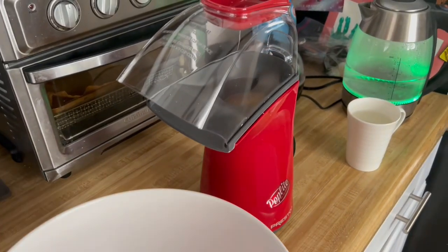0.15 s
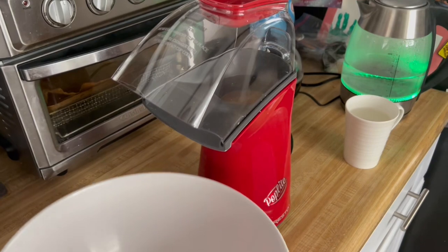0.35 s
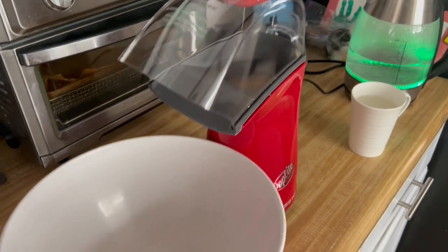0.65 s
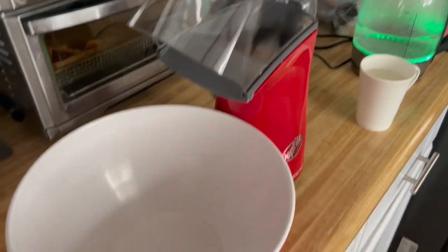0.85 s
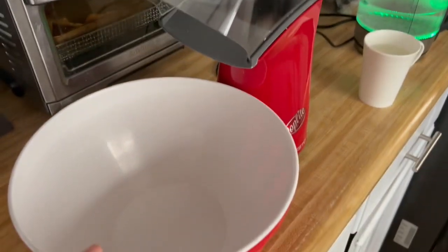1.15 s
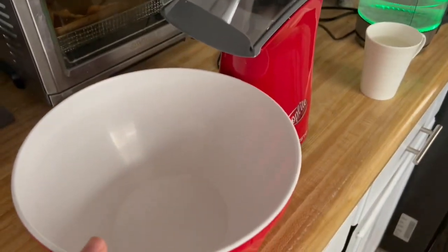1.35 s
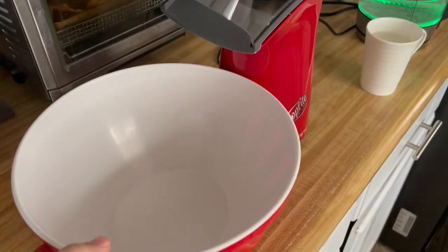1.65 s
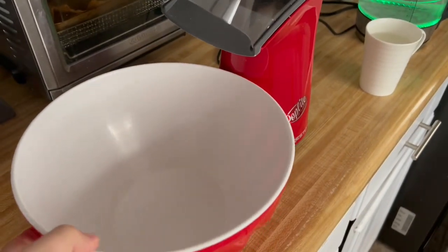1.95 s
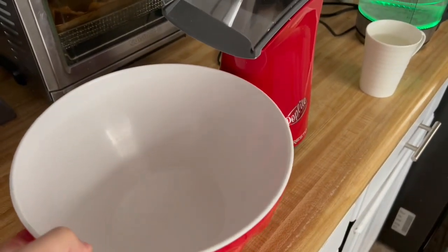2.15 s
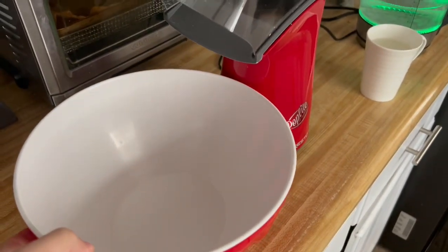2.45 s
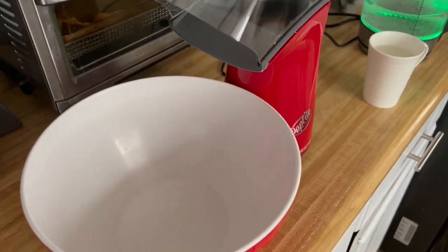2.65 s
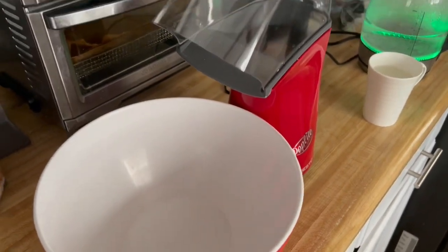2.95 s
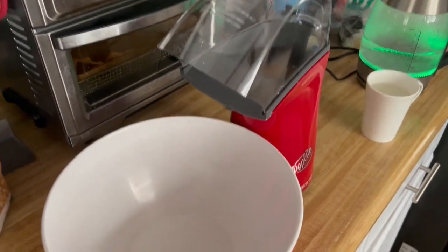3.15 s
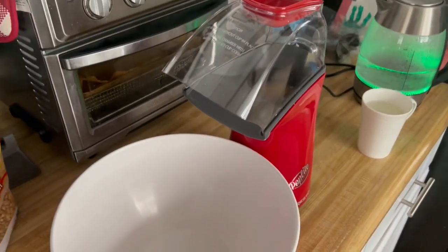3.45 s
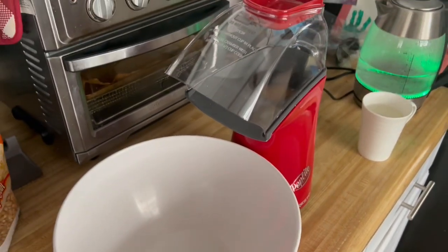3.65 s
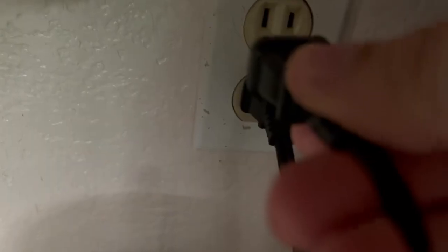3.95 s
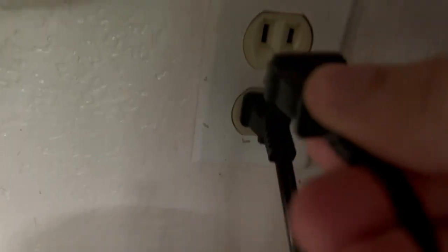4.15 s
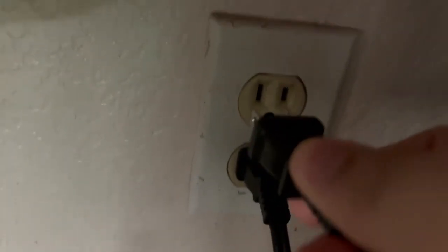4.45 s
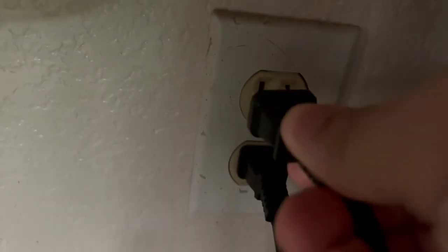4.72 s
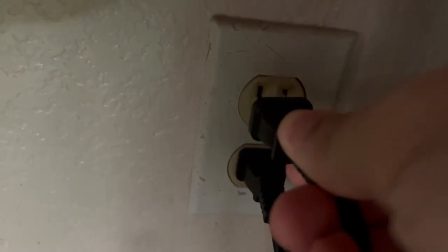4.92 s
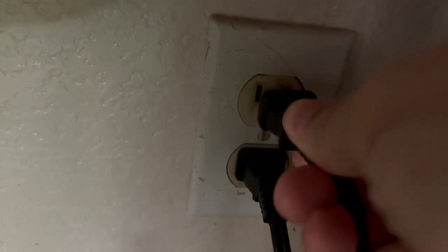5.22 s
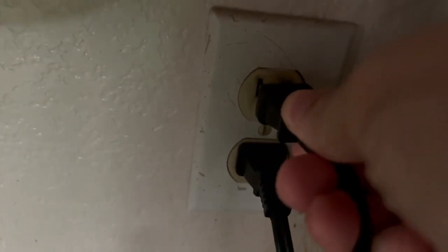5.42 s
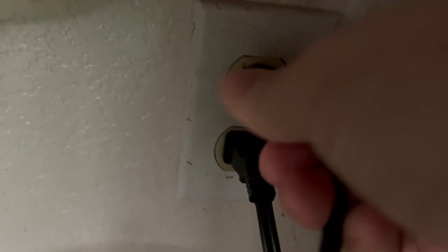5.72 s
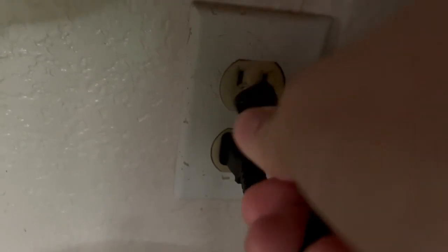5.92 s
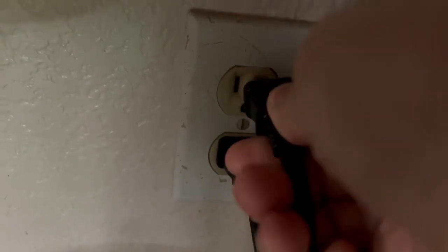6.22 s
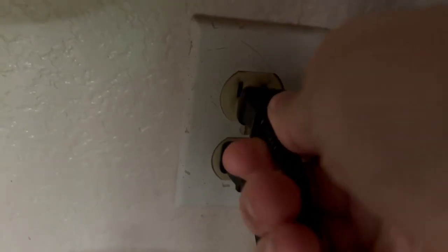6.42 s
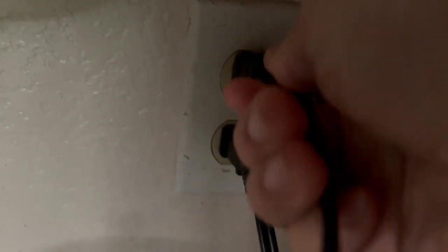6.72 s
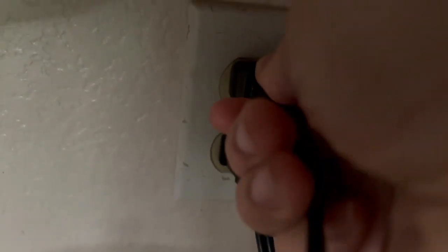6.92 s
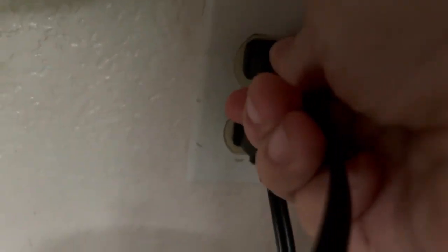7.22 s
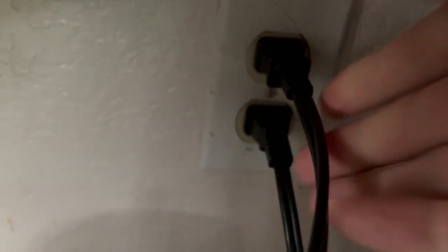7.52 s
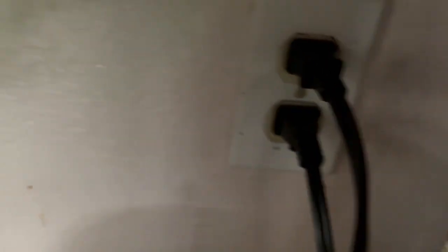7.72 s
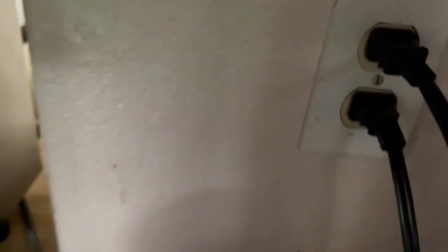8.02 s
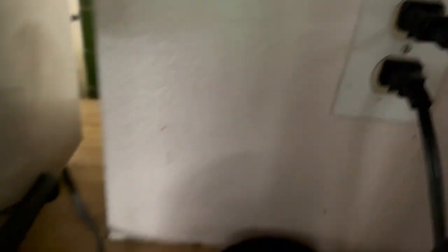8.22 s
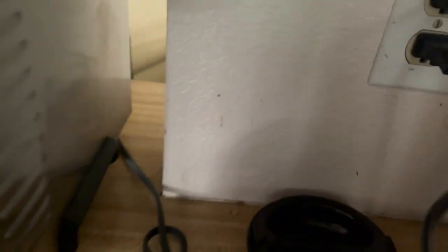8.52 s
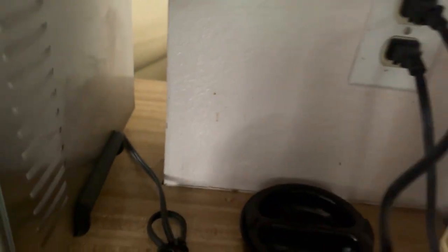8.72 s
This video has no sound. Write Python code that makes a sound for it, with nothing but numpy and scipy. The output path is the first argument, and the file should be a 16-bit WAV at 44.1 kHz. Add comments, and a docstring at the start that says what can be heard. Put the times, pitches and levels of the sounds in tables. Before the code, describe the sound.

Hollow bowl knocks and plug clicks over a kitchen hum, then a popcorn popper's motor speeds up, blowing air and rattling kernels.

```python
"""A kitchen counter, close to a phone; appliances hum throughout. A plastic bowl is knocked and slid
into place. A fingertip taps the phone, which is then held by the wall, where the hum is louder, and a
plug clicks and scrapes its way into a socket. A popcorn popper's motor runs up to speed, its fan
humming through the housing under rushing air. The phone turns towards it as the kernels start to
swirl, tick on the chamber wall and get tossed up the chute."""
import sys
import numpy as np
from scipy import signal
from scipy.fft import rfft, irfft, next_fast_len
from scipy.io import wavfile
from scipy.ndimage import uniform_filter1d, map_coordinates

SR = 44100
rng = np.random.default_rng(int(sys.argv[2]) if len(sys.argv) > 2 else 0)


def dump_mix(stems):
    """Bounce the given channels to the path in sys.argv[1] as a 16-bit WAV at rate SR."""
    frames = np.atleast_2d(stems).T  # one column per channel
    limited = np.clip(frames, -1, 1)  # hard clip at full scale
    pcm = np.round(limited * 32767).astype(np.int16)
    wavfile.write(sys.argv[1], SR, pcm)


N = 391166
TIME = np.arange(N) / SR
WALL_S, TURN_S, TURN_LENGTH_S = 3.86, 7.64, 0.93  # phone at the socket, then turning to the popper


def amp(db):
    """Level to gain."""
    return 10 ** (np.asarray(db) / 20)


def unit(x):
    """Scale to rms 1."""
    return x / np.sqrt(np.mean(x ** 2) + 1e-20)


def along(points, hz):
    """Interpolate (freq_hz, value) points on a log axis."""
    freqs, values = np.transpose(points)
    return np.interp(np.log(hz + 1), np.log(freqs + 1), values)


def ramp(start_s, length_s):
    """Linear rise from 0 to 1."""
    return np.clip((TIME - start_s) / length_s, 0, 1)


def swells(rows):
    """Gaussian envelopes from (centre_s, half_length_s, level_db) rows."""
    return sum(amp(db) * np.exp(-((TIME - s) / half_s) ** 2) for s, half_s, db in rows)


def wobble(rate_hz):
    """Smooth random curve."""
    return map_coordinates(rng.standard_normal(int(N * rate_hz / SR) + 4), [TIME * rate_hz])


def filtered(x, response):
    """Apply a complex frequency response."""
    n = x.shape[-1]
    padded = next_fast_len(n + 8192)
    return irfft(rfft(x, padded) * response(np.fft.rfftfreq(padded, 1 / SR)), padded)[..., :n]


def spectrum(points):
    """Response through (freq_hz, level_db) points."""
    return lambda hz: amp(along(points, hz))


def modes(table):
    """Response of (centre_hz, width_hz, level_db) resonances."""
    return lambda hz: sum(
        (-1) ** k * amp(db) * 1j * hz * width / (centre ** 2 - hz ** 2 + 1j * hz * width)
        for k, (centre, width, db) in enumerate(table))


def placed(x, phase, balance):
    """Two microphone ports hear a source at different phase and level."""
    sides = np.array([[.5], [-.5]])
    return filtered(x, lambda hz: np.exp(1j * sides * along(phase, hz)) * amp(sides * along(balance, hz)))


def rush(response, coherence, patchy_db):
    """Stereo noise, rms 1, with random gain patches in time and frequency."""
    bins = signal.stft(rng.standard_normal((2, N)), nperseg=512)[2]
    patches = uniform_filter1d(uniform_filter1d(rng.standard_normal(bins.shape[1:]), 6, 0), 10, 1)
    pair = signal.istft(bins * amp(patchy_db * unit(patches)), nperseg=512)[1][:, :N]
    angle = lambda hz: np.arccos(np.clip(along(coherence, hz), -1, 1)) / 2
    mid, side = filtered(pair, lambda hz: response(hz) * [np.cos(angle(hz)), np.sin(angle(hz))])
    return unit(np.array([mid + side, mid - side]))


# room noise spectra: freq_hz, level_db
RUMBLE = [(15, -56.5), (25, -25.5), (40, -3.5), (64, -21), (88, -10), (127, -3), (188, -10), (208, -15),
          (301, -15), (425, -27), (469, -24.5), (1060, -35), (1320, -38.5), (1730, -40.5), (9000, -73),
          (11700, -92), (19800, -120)]
HISS = [(530, -52), (900, -10.5), (1270, -5.5), (1590, -5.5), (2050, -7.5), (3300, -24.5), (3940, -14),
        (5120, -12), (7060, -11), (15500, -43.5)]
# rumble, left to right: freq_hz, coherence
RUMBLE_COHERENCE = [(60, 0.93), (150, 0.94), (300, 0.9), (1000, 0.057)]
# room layers: counter_db, socket_db, turn_change_db
HUM_DB, RUMBLE_DB, HISS_DB = (-57, -45, -9), (-53.5, -47, 2), (-80, -77, -4)


def room():
    """Wavering mains hum and its third harmonic, a small fan, building rumble, faint hiss."""
    at_wall, turned = ramp(WALL_S, 0.0074), ramp(TURN_S, TURN_LENGTH_S)
    hum_db, rumble_db, hiss_db = [
        counter + (socket - counter) * at_wall + change * turned + 1.6 * wobble(1.9)
        for counter, socket, change in (HUM_DB, RUMBLE_DB, HISS_DB)]
    hum = amp(hum_db + 0.81 * wobble(8.7)) * np.sin(2 * np.pi * 59.7 * TIME + 0.6 * wobble(9))
    third = amp(hum_db - 10 + 1.4 * wobble(6)) * np.sin(2 * np.pi * 179 * TIME + 0.99 * wobble(7.2))
    fan = amp(-82) * unit(filtered(rng.standard_normal(N), modes([(1870, 250, 0)])))
    rumble = amp(rumble_db) * rush(spectrum(RUMBLE), RUMBLE_COHERENCE, patchy_db=0.1)
    hiss = amp(hiss_db) * rush(spectrum(HISS), coherence=[(1000, 0.13)], patchy_db=6)
    return np.sqrt(2) * hum + third + fan + rumble + hiss


def struck(contacts, body, snap_spectrum, rattle_s, t60_s):
    """Each contact rings low, middle and high modes (thud, knock, clack) and adds a noisy snap."""
    out, t = np.zeros(N + SR), np.arange(SR // 3) / SR
    linger_db = 22.5  # thud excess over clack or snap that doubles the fade time
    for start_s, clack_db, clack_hz, thud_db, knock_db, snap_db in contacts:
        scatter_db, phases = rng.standard_normal((2, len(body))) * [[2.5], [0.9]]
        excess_db = np.clip(thud_db - max(clack_db, snap_db), -2 * linger_db, linger_db)
        fade = amp(-60 * t / (t60_s * 2 ** (excess_db / linger_db)))
        ring = 0
        for k, (hz, mode_db, mode_t60_s) in enumerate(body):
            spot_db = clack_db - 4 - 13 * abs(np.log2(hz / clack_hz))  # the spot favours its own pitch
            blow_db = thud_db if hz < 260 else knock_db if hz < 750 else spot_db if hz < 3500 else snap_db
            decay = amp(mode_db + scatter_db[k] + blow_db - 60 * t / mode_t60_s)
            attack = 1 - np.exp(-t * hz / 0.71)
            ring += (-1) ** k * decay * attack * np.sin(2 * np.pi * hz * t + phases[k])
        rattle = amp(-60 * t / rattle_s) + 0.46 * fade  # sharp edge over a longer scrape
        noise = rng.standard_normal((2, len(t)))
        chatter_db = 4.5 * np.minimum(t / 0.0085, 1) * np.repeat(rng.standard_normal(len(t) // 100), 100)
        noise *= amp(chatter_db)
        snap = amp(snap_db) * unit(filtered(noise[0], spectrum(snap_spectrum)))
        clack = unit(filtered(noise[1], modes([(clack_hz, 300, 1.5), (1500, 2500, -12)])))
        hit = ring * np.sqrt(fade) + rattle * amp(clack_db - 9.5) * clack
        hit *= 1 - np.exp(-t / 0.0014)  # plastic gives before it rings
        hit += rattle * snap * (1 - np.exp(-t / 0.00078))
        out[round(start_s * SR):][:len(t)] += hit
    return out[:N]


# bowl on counter: start_s, clack_db, clack_hz, thud_db, knock_db, snap_db
BOWL_CONTACTS = [(0.288, -6, 1121, -11, -12.5, -37.5), (0.463, -10, 1017, -15, -14, -34.5),
                 (0.577, -14, 1236, -28.5, -30, -23), (0.606, -18, 954, -18.5, -29, -53),
                 (0.621, -31, 1060, -19.5, -34.5, -42.5), (0.94, -55, 935, -55, -72.5, -63),
                 (1.904, -29, 1170, -42.5, -38.5, -39), (1.995, -42, 1230, -20.5, -38.5, -58),
                 (2.14, -48, 802, -43, -72, -64), (2.246, -58, 840, -63, -68, -57.5),
                 (2.317, -53.5, 2270, -30.5, -52, -72), (2.554, -54.5, 2290, -74, -67, -66),
                 (2.739, -73, 2720, -66, -65, -47), ]
# bowl modes: pitch_hz, level_db, t60_s
BOWL_MODES = [(68.6, -6, 0.2), (129, -1.5, 0.04), (177, -2.5, 0.15), (252, 3, 0.063), (328, 0.5, 0.07),
              (430, 3, 0.06), (499.5, 1.5, 0.058), (586, -1, 0.06), (770, -4.5, 0.082), (1037, -9.5, 0.06),
              (1445, -7, 0.042), (2320, -7.5, 0.1), (2600, -8, 0.05)]
# contact noise: freq_hz, level_db
BOWL_NOISE = [(800, -24), (2000, -2.5), (3500, 0), (5000, -1.5), (7000, -1), (10000, -13), (15500, -16),
              (16200, -56.5)]


def bowl_knocks():
    """A plastic bowl rings as it hits the counter."""
    return struck(BOWL_CONTACTS, BOWL_MODES, BOWL_NOISE, rattle_s=0.02, t60_s=0.16)


# rubs: centre_s, half_length_s, level_db
SLIDES = [(1.414, 0.025, -79), (1.742, 0.031, -69), (2.535, 0.058, -77), (1.2, 0.029, -76.5),
          (4.0, 0.067, -93), (5.0, 0.24, -74)]
# squeaks: start_s, length_s, pitch_hz, rise_hz, level_db
SQUEAKS = [(1.373, 0.13, 5960, 700, -71), (3.726, .12, 6100, 199, -80.5)]


def rubbing():
    """Friction on the counter: soft slides, thin squeaks arching in pitch."""
    out = swells(SLIDES) * unit(filtered(rng.standard_normal(N), spectrum(BOWL_NOISE)))
    for start_s, length_s, pitch_hz, rise_hz, db in SQUEAKS:
        arch = np.sin(np.pi * ramp(start_s, length_s))
        envelope = np.sqrt(np.abs(arch)) * amp(db + 5.9 * wobble(72))
        hz = pitch_hz + rise_hz * arch + 0.016 * pitch_hz * wobble(300)
        out += envelope * np.sin(2 * np.pi * np.cumsum(hz) / SR)
    return out


# phone case: centre_hz, width_hz, level_db
CASE_MODES = [(523, 160, 1), (1050, 220, -3), (1770, 130, -1.8)]


def finger_tap(start_s=3.719, peak_db=-32.5):
    """A fingertip on the phone's case, too close for the room to answer."""
    blow = np.zeros(N)
    blow[round(start_s * SR)] = 1
    ring = filtered(blow, lambda hz: modes(CASE_MODES)(hz) / (1 + 1j * hz / 1800) ** 2)
    return amp(peak_db) * ring / np.abs(ring).max()


# plug and cord against socket and wall, except the first row, a faint tick as the room hum jumps louder:
# start_s, clack_db, clack_hz, thud_db, knock_db, snap_db
PLUG_CONTACTS = [(3.853, -58, 1500, -47, -60, -72), (4.183, -28.5, 1280, -34.5, -49, -39),
                 (4.272, -44, 2230, -45.5, -68, -53), (4.408, -35, 1040, -28.5, -49, -51.5),
                 (4.486, -33, 1150, -28.5, -56, -45), (4.555, -52, 2000, -60, -66, -51),
                 (4.561, -41, 2180, -55, -59, -33), (4.583, -33, 2320, -33.5, -48, -71),
                 (5.222, -51, 1200, -44, -55, -60), (5.243, -40.5, 1400, -36, -35, -52.5),
                 (5.281, -27, 1240, -48, -40, -45), (5.32, -39.5, 1050, -51, -35, -80),
                 (5.392, -60, 2200, -64, -68, -66), (5.409, -40, 1150, -51, -62, -81),
                 (5.519, -50, 1260, -67, -74, -64), (5.604, -55, 1200, -64, -70, -64),
                 (5.616, -32.5, 1150, -38.5, -67, -60), (5.686, -40, 1100, -45, -43, -47),
                 (5.699, -31, 2186, -35, -43.5, -36.5), (5.747, -45, 2150, -34, -51, -68),
                 (5.785, -31, 1130, -25.5, -47, -55), (5.83, -31.5, 3050, -36, -52, -59),
                 (5.855, -32.5, 1130, -27.5, -56, -47.5), (6.059, -43, 1130, -61, -58, -65),
                 (6.184, -21, 1250, -31, -31.5, -41.5), (6.348, -28.5, 1070, -28.5, -48.5, -42.5),
                 (6.384, -37.5, 2770, -34.5, -62, -68), (6.423, -28.5, 1110, -26.5, -51, -44.5),
                 (6.48, -35, 1200, -29, -43, -69), (6.531, -29.5, 1060, -39, -45, -54),
                 (6.552, -48, 3080, -62, -64, -62), (6.582, -42, 1230, -59, -50, -69),
                 (6.646, -46, 3000, -64, -66, -78), (6.661, -50, 3000, -62, -64, -72),
                 (6.713, -40, 1140, -44, -40, -50), (6.724, -34.5, 2593, -34.5, -46, -44.5),
                 (6.761, -34, 3120, -36, -52, -62), (7.008, -22.5, 1090, -21, -26, -54),
                 (7.535, -26.5, 1320, -14.5, -45, -51), (8.134, -21, 1657, -19.5, -28, -31.5)]
# socket modes: pitch_hz, level_db, t60_s
SOCKET_MODES = [(117, -5.5, 0.063), (219.5, 0, 0.11), (302.4, 8, 0.074), (445, 8, 0.049), (600, 8, 0.029),
                (877, 1, 0.023), (1139, -1.5, 0.048), (1286, 1.5, 0.036), (1870, 9, 0.0085),
                (2107, -1.5, 0.054), (2320, -3.5, 0.063), (2710, -12, 0.055), (3070, -4.5, 0.054),
                (4440, 5.5, 0.014), (5300, -4.5, 0.017), (6570, -1.5, 0.047), (8140, -2.5, 0.037),
                (8900, 1, 0.022)]
# metal prong on plastic: freq_hz, level_db
PRONG_NOISE = [(1500, -3.5), (3000, 0.5), (4500, 1), (6500, 4), (9000, 3), (12000, -11.5), (15500, -4),
               (16200, -64)]


def plug_clicks():
    """Plug and cord strike socket and wall."""
    return struck(PLUG_CONTACTS, SOCKET_MODES, PRONG_NOISE, rattle_s=0.033, t60_s=0.13)


# prong strokes: centre_s, half_length_s, level_db
SCRAPES = [(4.43, 0.059, -64), (5.27, 0.051, -75), (5.72, 0.22, -67), (6.2, 0.11, -68.5),
           (6.4, 0.17, -56.5), (6.88, .08, -65.5)]
# scraping resonances: centre_hz, width_hz, level_db
PRONG_MODES = [(1270, 100, 0), (1960, 140, -3.5), (2570, 120, 3.5), (3260, 130, -2.5), (4580, 420, -3.5),
               (6300, 390, -6.5), (8280, 1700, -11)]


def prong_scrapes():
    """Prongs feel for the slots: clumps of short slips wake one resonance, then another."""
    slips = lambda: rng.standard_normal(N) * amp(5.5 * wobble(45) + 3 * wobble(250))
    return swells(SCRAPES) * unit(sum(filtered(slips(), modes([mode])) for mode in PRONG_MODES))


# motor run-up: time_s, shaft_hz
SHAFT_SPEED = [(6.7, 28), (7.05, 99), (7.1, 111), (7.214, 133.0), (7.302, 153.9), (7.498, 183.7),
               (7.58, 189.7), (7.814, 203.4), (8.39, 198.7), (8.8, 197.3)]
MOTOR_START_S, FULL_SPEED_HZ = SHAFT_SPEED[0][0], 200
# air path to the ports: freq_hz, left_lead_rad
POPPER_PHASE = [(100, 0.046), (180, 0.36), (350, 2.2), (2000, 1.36), (12000, 1.4)]
# phone at the socket, then turned: freq_hz, left_minus_right_db
WALL_BALANCE = [(60, 4.5), (200, -1.5), (420, -11), (520, -2), (850, 5), (1900, 1), (3800, 1), (7500, -3.5),
                (15000, 2.6)]
TURNED_BALANCE = [(60, -3.5), (200, -10), (420, 12), (520, 5), (850, 6.5), (1900, 2.5), (3800, -0.8),
                  (7500, -2), (15000, 0.2)]


def popper():
    """Air and motor tones follow shaft speed and the phone's turn."""
    shaft_hz = np.interp(TIME, *np.transpose(SHAFT_SPEED))
    halvings = np.maximum(np.log2(FULL_SPEED_HZ / shaft_hz), 0)
    turned = ramp(TURN_S, TURN_LENGTH_S)
    running_db = lambda full_db, loss_db, turn_db: full_db - loss_db * halvings + turn_db * turned
    sound = airflow(running_db) + motor(shaft_hz, turned, running_db)
    at_wall = placed(sound, POPPER_PHASE, WALL_BALANCE)
    facing = placed(sound, POPPER_PHASE, TURNED_BALANCE)
    return (1 - turned) * at_wall + turned * facing


# popper resonances: centre_hz, width_hz, level_db
BASE = [(138.2, 56, 0.5), (335.5, 130, 1.5), (405, 39, 7)]
HOUSING = [(492, 48, 2), (845, 52, 5), (656, 51, -16), (1034, 60, -10.5)]
CHAMBER_LOW = [(1160, 110, 0), (1420, 220, -2)]
CHAMBER_HIGH = [(1770, 150, 0)]
CHUTE = [(2240, 99, 2), (2538, 56, 7), (2920, 92, -2.5)]
AIR_PATHS = BASE, HOUSING[:1], HOUSING[1:], CHAMBER_LOW, CHAMBER_HIGH, CHUTE
# each air path, then the hiss: full_speed_db, loss_per_halving_db, turn_change_db
FLOW_LEVELS = [(-28, 15.5, -19.5), (-36, 9, 8), (-35, 17, 3.5), (-42.5, 8, 0), (-51.5, 1, 4),
               (-35.5, 30.5, 2), (-42.5, 13, 1)]
# air hiss spectra: freq_hz, level_db
JET = [(1500, -25.5), (2300, -12.5), (3200, 2), (6000, 2.5), (8000, -2.5), (11000, -31)]
FIZZ = [(4000, -20), (7000, -2), (9000, 0), (12000, -1), (15600, -5), (16200, -60)]
# air, left to right: freq_hz, coherence
AIR_COHERENCE = [(100, 1), (300, 0.99), (1000, 0.66), (4000, .4), (12000, 0.94)]


def airflow(running_db):
    """Uneven flow sounds through base, housing, chamber and chute, hisses and carries the kernels."""
    *paths_db, steady_db = [running_db(*row) for row in FLOW_LEVELS]
    air = 0
    for db, path in zip(paths_db, AIR_PATHS):
        surge = amp(db + 0.42 * wobble(25) + 1.6 * wobble(5))
        response = lambda hz: np.abs(modes(path)(hz)) ** 1.24  # deeper valleys between resonances
        air += surge * rush(response, AIR_COHERENCE, patchy_db=2)
    hiss_db = kernel_hiss_db(steady_db)
    fizz_db = hiss_db + 0.45 * (hiss_db + 36)  # stronger flow is brighter
    air += amp(hiss_db + 2.5) * rush(spectrum(JET), AIR_COHERENCE, patchy_db=1)
    air += amp(fizz_db) * rush(spectrum(FIZZ), AIR_COHERENCE, patchy_db=2)
    air += amp(hiss_db - 11) * ramp(SWIRL_S, SWIRL_RISE_S) * kernel_ticks()
    return air * ramp(MOTOR_START_S, 0.13)


# motor mount: centre_hz, width_hz, level_db
MOUNT_MODES = [(129.8, 12, -26), (177.6, 24, -28), (210, 27, -28)]
# shaft harmonics: order, full_speed_db, loss_per_halving_db, turn_change_db
HUM_ORDERS = [(2, -44.5, 10.5, 6.5), (3, -55, 24, 10), (5, -58, 17, 8), (7, -43, 138.5, 3.5),
              (8, -71, 12, 24.5), (9, -68.5, 27, 14)]
# harmonics loud only near a chamber resonance: order, level_db
WHINE_ORDERS = [(9, -51), (10, -44), (16, -42)]


def motor(shaft_hz, turned, running_db):
    """Shaft unbalance shakes the base; harmonics hum, and whine as they pass chamber resonances."""
    angle = 2 * np.pi * np.cumsum(shaft_hz) / SR
    shake = np.sqrt(sum(np.abs(modes([mode])(shaft_hz)) ** 2 for mode in MOUNT_MODES))
    shake *= amp(-9 * turned + 1.1 * wobble(24) + 1.1 * wobble(6.3))  # weaker away from the wall
    tones = ramp(7.08, 0.11) * shake * np.sin(angle + 0.24 * wobble(30))
    for order, *levels in HUM_ORDERS:
        tones += amp(running_db(*levels) + 4.5 * wobble(9)) * np.sin(order * angle + 0.47 * wobble(30))
    for order, db in WHINE_ORDERS:
        resonance = np.abs(modes(CHAMBER_LOW[:1] + CHAMBER_HIGH)(order * shaft_hz)) ** 1.8
        tones += amp(db + 3 * wobble(30)) * resonance * np.sin(order * angle + wobble(60))
    return np.sqrt(2) * ramp(7.0, 0.068) * tones


# kernels tossed up the chute: peak_s, level_db, t60_s
TOSSES = [(8.055, -34, 0.22), (8.19, -42, 0.34), (8.235, -35, 0.22), (8.326, -35.5, .4), (8.44, -38, 0.5),
          (8.53, -38.5, 0.14), (8.61, -39.5, 0.23), (8.715, -33, 0.17), (8.8, -37, 0.68)]
SWIRL_S, SWIRL_RISE_S = 7.8, 0.073


def kernel_hiss_db(steady_db, lift_db=11.5, ease_s=3.1, attack_s=0.0025):
    """The hiss grows as kernels lift and swirl, then eases; each toss adds a burst."""
    decay = lambda start_s, t60_s: amp(-60 * np.maximum(TIME - start_s, 0) / t60_s)
    swirl_db = lift_db * ramp(SWIRL_S, SWIRL_RISE_S) * decay(SWIRL_S, ease_s)
    tossed = sum(amp(db) * ramp(s - attack_s, attack_s) * decay(s, t60_s) for s, db, t60_s in TOSSES)
    return 20 * np.log10(amp(steady_db + swirl_db) + tossed) + 0.72 * wobble(45) + 0.92 * wobble(160)


def kernel_ticks(per_s=900, centre_hz=6500, span_octaves=2.4, t60_cycles=22, spread_db=4):
    """Kernels hit the chamber wall, each ringing at its own pitch and side; rms 1 while running."""
    run_s = N / SR - MOTOR_START_S
    when, size, pitch, side = rng.random((round(per_s * run_s), 4)).T
    t = np.arange(SR // 100) / SR
    hz = np.clip(centre_hz * 2 ** (span_octaves * (pitch - 0.5)), 0, SR / 3)[:, None]
    level_db = -spread_db * np.log(1 - size)[:, None]
    rings = amp(level_db - 60 * t * hz / t60_cycles) * np.sin(2 * np.pi * hz * t)
    samples = ((MOTOR_START_S + when * run_s) * SR).astype(int)[:, None] + np.arange(len(t))
    pair = np.array([np.bincount(samples.ravel(), (rings * pan[:, None]).ravel(), N + SR)[:N]
                     for pan in (np.sqrt(side), np.sqrt(1 - side))])
    return pair / np.sqrt(np.mean(pair[:, round(MOTOR_START_S * SR):] ** 2))


# kitchen decay: freq_hz, t60_s
KITCHEN_DECAY = [(150, 0.33), (1000, 0.26), (4000, 0.29), (12000, 0.0096)]


def kitchen_reverb(x):
    """Each frequency dies at its own rate; the tail varies as things move."""
    out, step = np.zeros((2, N + SR)), SR // 8
    for start in range(0, N, step):
        hz, t, bins = signal.stft(rng.standard_normal((2, SR // 2)), SR, nperseg=256)
        tail = signal.istft(bins * amp(-60 * t / along(KITCHEN_DECAY, hz)[:, None]), SR, nperseg=256)[1]
        wet = signal.fftconvolve(x[None, start:start + step], tail / np.linalg.norm(tail[0]), axes=1)
        out[:, start:start + wet.shape[1]] += wet
    left, right = out[:, :N]
    # long waves reach both ports alike
    side = filtered(left - right, lambda hz: 1 / (1 + (220 / (hz + 1)) ** 3))
    return (left + right + np.array([side, -side])) / 2


# phase at the ports: freq_hz, left_lead_rad
BOWL_PHASE = [(100, .05), (200, 0.31), (400, 0.52), (2000, 0.35), (12000, 2.4)]
PLUG_PHASE = [(100, 0.046), (200, 0.13), (400, 0.33), (2000, 1.1), (12000, 1.6)]
# level at the ports: freq_hz, left_minus_right_db
BOWL_BALANCE = [(60, 0.0), (240, 0.5), (950, -1.0), (3770, 0.0), (15000, 0.5)]
PLUG_BALANCE = [(60, 2), (240, -2.5), (950, 0.53), (3770, -0.5), (15000, -2.5)]


def scene():
    """Bowl, tap, plug and popper in the humming kitchen."""
    bowl = bowl_knocks() + rubbing()
    plug = plug_clicks() + prong_scrapes()
    direct = placed(bowl, BOWL_PHASE, BOWL_BALANCE) + placed(plug, PLUG_PHASE, PLUG_BALANCE)
    reverb = kitchen_reverb(amp(-5) * bowl + amp(-11.5) * plug)
    return direct + reverb + finger_tap() + popper() + room()


def record(dry):
    """The phone rolls off deep bass and cuts everything above its band limit."""
    bass_hz, top_hz = 30, 17100
    return filtered(dry, lambda hz: (1j * hz / (bass_hz + 1j * hz)) ** 2 * (hz < top_hz))


dry = scene()
out = record(dry)
dump_mix(out)
```